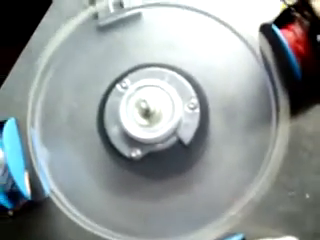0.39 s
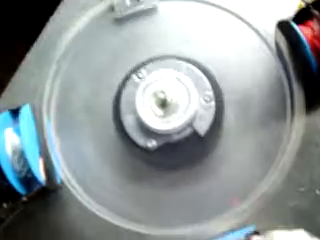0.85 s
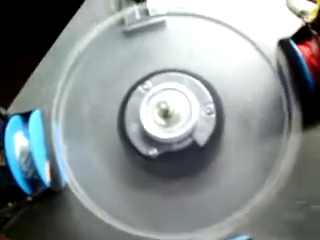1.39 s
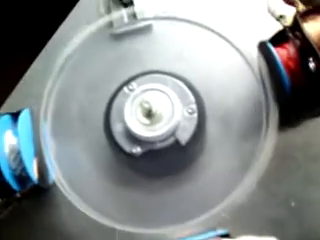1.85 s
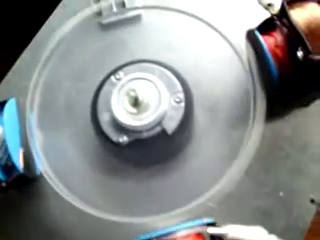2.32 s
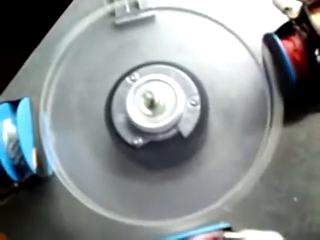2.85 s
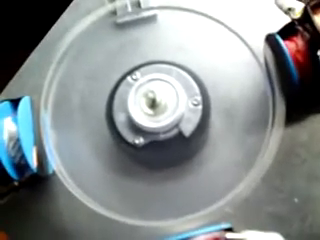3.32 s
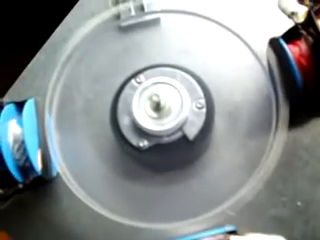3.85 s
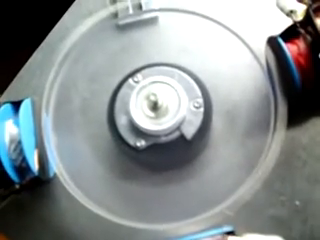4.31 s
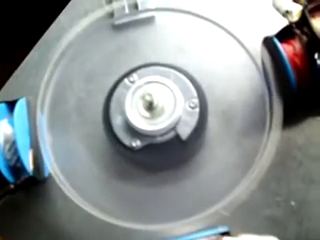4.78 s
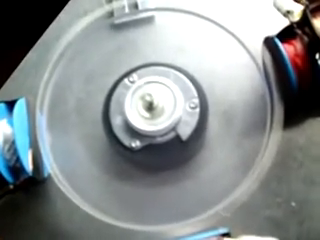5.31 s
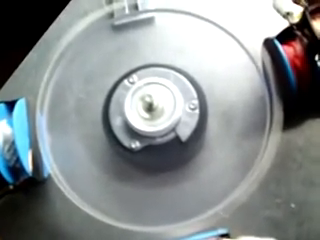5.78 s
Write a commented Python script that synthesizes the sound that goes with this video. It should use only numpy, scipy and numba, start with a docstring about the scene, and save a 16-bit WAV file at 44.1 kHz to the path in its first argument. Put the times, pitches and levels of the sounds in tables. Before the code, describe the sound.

Close and mono, a small disc rotor on a table runs with a steady, reedy low-mid hum, thin coil whine, rapid fused ticking and soft air noise. After about 2.3 seconds a switch snaps brightly, the level ducks briefly, and the hum slides smoothly downward to the end, swelling as it crosses resonances of the frame. Faint low rumble lies beneath.

```python
"""Magnet rotor switched off and coasting

A small disc rotor with four magnets spins past drive coils on a table, heard close up in mono.
Each passing magnet tugs the frame, which hums on multiples of the passing rate, ticks and stirs the air.
A switch snaps off, gain control ducks the level, and the hum glides down through the frame's resonances.
Low rumble, a faint hum, climbing tones as of a far engine and a late thin whistle lie beneath.
"""
import sys
import numpy as np
from scipy import signal
from scipy.fft import rfft, irfft, next_fast_len
from scipy.io import wavfile
from scipy.ndimage import minimum_filter1d, map_coordinates
from numba import njit

SR = 44100
rng = np.random.default_rng(int(sys.argv[2]) if len(sys.argv) > 2 else 0)


def magnitude_from_level(level_db):
    """Linear magnitude for a level in decibels (20 dB per decade)."""
    exponent = np.asarray(level_db, float) / 20
    return 10 ** exponent


def pcm_store(signal):
    """Save signal as 16-bit PCM."""
    levels = np.round(np.clip(np.atleast_2d(signal), -1, 1) * 32767)
    wavfile.write(sys.argv[1], SR, levels.astype(np.int16).T)


N = 260617
TIME_S = np.arange(N) / SR
SWITCH_S = 2.302
SINCE_SWITCH_S = np.clip(TIME_S - SWITCH_S, 0, None)
RUNNING_PER_S = 170.13                       # magnets per second
RUN_IN = round(28 * SR / RUNNING_PER_S)      # samples in seven whole turns


def rms_one(x):
    """Scale to rms 1."""
    return x / np.sqrt(np.mean(x ** 2) + 1e-20)


def drift(rate_hz):
    """Slow random wander of rms 1: critically damped low-pass noise, drawn at every 50th sample."""
    r = np.exp(-100 * np.pi * rate_hz / SR)
    noise = rng.standard_normal(N // 50 + 1002)
    slow = signal.lfilter([1], [1, -2 * r, r * r], noise)[1000:]
    return np.interp(np.arange(N) / 50, np.arange(len(slow)), rms_one(slow))


def cut(x, hz, kind, order=2):
    """Butterworth filter."""
    return signal.sosfilt(signal.butter(order, hz, kind, fs=SR, output="sos"), x)


def resonances(x, modes):
    """Two-pole resonances (Hz, width Hz, gain dB) side by side, signs alternating."""
    out = 0
    for k, (hz, width_hz, db) in enumerate(modes):
        r = np.exp(-np.pi * width_hz / SR)
        poles = [1, -2 * r * np.cos(2 * np.pi * hz / SR), r * r]
        zeros = np.array([1, 0, -1]) * (1 - r * r) / 2
        out = out + (-1) ** k * magnitude_from_level(db) * signal.lfilter(zeros, poles, x + 1e-18)
    return out


def coil_current():
    """1 while the coils are driven, exponential decay after the switch."""
    fade_s = 0.005
    return np.exp(-SINCE_SWITCH_S / fade_s)


def hum(passes, waver_db):
    """Force tones on multiples of the passing rate; their mix changes when the coil current dies."""
    # low tones, in multiples of the passing rate; fractions come from the uneven magnets
    low_multiples = [.25, .5, 1, 2, 3, 4, 4.75, 5, 6, 6.75, 7, 8, 9, 10, 11, 11.5, 12, 13, 14]
    # rms of each low tone ahead of pull and frame: coils_on_db, coasting_db
    low_tones = [(-55.5, -45.5), (-55, -50), (-18, -21), (-23, -20.5), (-36.5, -40), (-26, -27),
                 (-48.5, -50.5), (-36, -31.5), (-24.5, -32.5), (-47.5, -57), (-29.5, -40), (-44, -46.5),
                 (-36, -39), (-36.5, -45.5), (-37, -42.5), (-41.5, -56.5), (-42.5, -46.5), (-52.5, -46),
                 (-43, -45.5)]
    # high coil whines, in multiples of the passing rate
    whine_multiples = [15.25, 16, 20, 20.25, 23, 27.75, 28]
    whines = [(-43, -56)] * len(whine_multiples)      # coils_on_db, coasting_db
    lead_rad = 2.6      # low tones run ahead of the high ones, which shapes the pulse

    coils, out = coil_current(), 0
    multiples = [*low_multiples, *whine_multiples]
    for multiple, (on_db, off_db) in zip(multiples, [*low_tones, *whines]):
        gain = magnitude_from_level(off_db + coils * (on_db - off_db) + waver_db * drift(5.4))
        phase = 2 * np.pi * multiple * passes + lead_rad / multiple
        out = out + gain * np.sqrt(2) * np.cos(phase)
    return out


def frame(force, reach):
    """Plain path less each mode: a dip just below every resonance, a shoulder above it."""
    # frame resonances: mode_hz, width_hz, level_db above the plain path
    frame_modes = [(374.1, 2.63, 28), (378.6, 3.2, 30), (434, 19, 4), (556, 96, 0), (791, 12, 5),
                   (860, 140, -2), (1164.9, 14.1, 23.5), (1879.6, 25, 10)]
    force = np.concatenate([force[:RUN_IN], force])       # modes already ring at the start
    out = force
    for hz, width_hz, db in frame_modes:
        r, w = np.exp(-np.pi * width_hz / SR), 2 * np.pi * hz / SR
        near = resonances(force, [(hz, reach * hz, db)])      # far-off tones leave the mode alone
        poles = [1, -2 * r * np.cos(w), r * r]
        out = out - signal.lfilter([0, 2 * (1 - r) * np.sin(w)], poles, near)
    return out[RUN_IN:]


def bearing(passes):
    """Rolling parts give fractional multiples, each heard mainly while it crosses its mode."""
    # bearing tones, in multiples of the passing rate
    bearing_multiples = [2.512, 7.56, 8.63, 9.7]
    # mode each one wakes: mode_hz, width_hz, level_db (rms of a steady tone at the peak)
    bearing_swells = [(377.6, 5.9, -16.5), (1194, 23, -29.5), (1171, 26, -24), (1173, 39, -29.5)]
    out, settle = 0, np.clip(np.arange(N) / RUN_IN, 0, 1)
    for multiple, (hz, width_hz, db) in zip(bearing_multiples, bearing_swells):
        tone = settle * np.sqrt(2) * np.cos(2 * np.pi * multiple * passes)
        once = resonances(tone, [(hz, width_hz, db)])
        out = out + resonances(once, [(hz, width_hz, 0)])
    return out


def air(passes, gust_depth, patchy_db, frame_share):
    """Noise of the stirred air, puffed once per magnet; a share shakes the frame."""
    # air noise spectrum: freq_hz, level_db (relative)
    air_spectrum = [(20, -11.5), (60, -7), (120, 2.5), (200, 4.5), (420, 0), (700, 2), (1170, 2),
                    (1500, -3.5), (2200, -6.5), (2800, -6), (3100, -11), (4050, -14.5), (4600, -15.5),
                    (5400, -20), (6400, -30.5), (7100, -47)]
    size = next_fast_len(N)
    hz, db = np.transpose(air_spectrum)
    bins_hz = np.arange(size // 2 + 1) * SR / size
    spectrum_db = np.interp(np.log(bins_hz + 1), np.log(hz), db)
    noise = irfft(rfft(rng.standard_normal(size)) * magnitude_from_level(spectrum_db), size)[:N]
    puffs = 1 + gust_depth * np.cos(2 * np.pi * passes)
    noise = noise * puffs * magnitude_from_level(patchy_db * drift(2.0))
    return rms_one(noise + frame_share * (frame(noise, reach=1.0) - noise))


def ticks(passes, tail, fresh):
    """Rattle per magnet rings the chassis: one part repeats every turn, one is new each time."""
    # magnet differences: strength_db (relative), place_spacings
    magnets = [(0, .01), (-2, .03), (-1, -.02), (-2.5, .04)]
    # chassis resonances: mode_hz, width_hz, gain_db (relative)
    chassis_modes = [(1894, 83, -6.5), (2616, 100, 3), (3468, 88, 5), (4160, 480, -7.5), (4660, 290, 1.5),
                     (6400, 230, -18.5), (6275, 190, -7.5)]
    strength_db, place = np.transpose(magnets)
    magnet = passes.astype(int) % len(magnets)
    burst = 0
    for db, at in [(0, 0), (-9, .5)]:       # a weaker tick half a spacing later, as the magnet leaves
        burst = burst + magnitude_from_level(db) * np.exp(-((passes - place[magnet] - at) % 1) / tail)
    burst = burst * magnitude_from_level(strength_db[magnet])

    bumps = rng.standard_normal(512)                       # roughness around the rim
    angle = passes / len(magnets) % 1 * len(bumps)
    same = map_coordinates(bumps, [angle], order=3, mode="grid-wrap")
    rattle = burst * (same + fresh * rng.standard_normal(N))
    return rms_one(resonances(rattle, chassis_modes))


def rumble():
    """Low shaking carried through the table: band noise, rms 1."""
    return rms_one(cut(rng.standard_normal(N), [25, 110], "band"))


def far_tones(second_db, waver_db):
    """Faint steady hum until the switch; climbing tones with a weak second harmonic fade in and out."""
    # low tones as of a far engine pulling away: start_s, end_s, start_hz, end_hz, level_db
    # (level_db: rms of the fundamental, before fade and waver)
    far_engine = [(.3, 2.35, 60, 109, -38.5), (2.55, 5.35, 57, 100, -36), (4.1, 5.8, 64, 85, -35.5)]
    hum_hz, hum_rms_db = 55, -45.5
    out = magnitude_from_level(hum_rms_db) * np.sqrt(2) * np.sin(2 * np.pi * hum_hz * TIME_S) * (TIME_S < SWITCH_S)
    for start_s, end_s, start_hz, end_hz, db in far_engine:
        pitch_hz = np.interp(TIME_S, [start_s, end_s], [start_hz, end_hz])
        phase = 2 * np.pi * np.cumsum(pitch_hz) / SR
        progress = np.clip((TIME_S - start_s) / (end_s - start_s), 0, 1)
        fade = np.sin(np.pi * progress) ** 0.26
        tone = np.sin(phase) + magnitude_from_level(second_db) * np.sin(2 * phase)
        out = out + magnitude_from_level(db + waver_db * drift(17.0)) * np.sqrt(2) * fade * tone
    return out


def switch():
    """Bright snap of a few ms, its plastic body, and a one-sided pressure push that sinks away."""
    snap_peak_db, snap_hz, push_db, push_fade_s = 4, 12500, -16, .06
    bounce_s, bounce_db = .0037, -8         # the contact bounces once
    t = SINCE_SWITCH_S
    again = np.clip(t - bounce_s, 0, None)
    first = (t > 0) * np.exp(-t / .0015)
    second = magnitude_from_level(bounce_db) * (again > 0) * np.exp(-again / .002)
    burst = (first + second) * rng.standard_normal(N)
    body = resonances(burst, [(4200, 1600, -7)])
    snap = cut(burst, snap_hz, "high", order=4) + body
    push = (1 - np.exp(-t / .002)) * np.exp(-t / push_fade_s)
    return magnitude_from_level(snap_peak_db) * snap / np.abs(snap).max() + magnitude_from_level(push_db) * push


def whistle():
    """Thin fixed sine that comes up late."""
    pitch_hz, start_s, rise_s, top_rms_db = 3841, 3.3, 0.93, -50.5
    rise = np.clip((TIME_S - start_s) / rise_s, 0, 1) ** 2
    return magnitude_from_level(top_rms_db) * rise * np.sqrt(2) * np.sin(2 * np.pi * pitch_hz * TIME_S)


def scene():
    """Hum through the frame, plus bearing, air, ticks, rumble, far tones, switch and whistle."""
    # magnetic pull on the frame: time_s, level_db
    pull_curve = [(0, -3.5), (2.29, -4), (2.33, -3), (2.8, 2), (3.4, -1.5), (4.3, -3), (5.2, -0.5),
                  (5.6, -3.5), (5.91, -8.5)]
    slowing, easing = 15.854, .5604     # loss of rate per s; its let-up per s squared
    rate = RUNNING_PER_S - slowing * SINCE_SWITCH_S + easing * SINCE_SWITCH_S ** 2
    passes = np.cumsum(rate) / SR
    octaves = np.log2(rate / RUNNING_PER_S)
    off = 1 - coil_current()
    pull_db = np.interp(TIME_S, *np.transpose(pull_curve))

    # air and ticks follow the pull and fade as the rotor slows
    air_db = -23 + 0.65 * pull_db + 2 * octaves
    tick_db = -30.5 + pull_db + 8.2 * octaves - 6.5 * off      # softer without coil current
    rumble_db = -52.5 + 15 * off

    force = magnitude_from_level(pull_db) * hum(passes, waver_db=0.47)
    out = frame(force, reach=0.27) + bearing(passes)
    out = out + magnitude_from_level(air_db) * air(passes, gust_depth=.15, patchy_db=.25, frame_share=.04)
    out = out + magnitude_from_level(tick_db) * ticks(passes, tail=0.13, fresh=1.0)
    out = out + magnitude_from_level(rumble_db) * rumble() + far_tones(second_db=-12, waver_db=2.5)
    return (out + switch() + whistle())[None]


@njit
def follow(level_db, start_db, attack, release):
    """One-pole level follower: rises fast with the peaks, falls slowly."""
    out, held = np.empty_like(level_db), start_db
    for i in range(len(level_db)):
        held += (level_db[i] - held) * (attack if level_db[i] > held else release)
        out[i] = held
    return out


def gain_control(x):
    """Squeezes level about a knee, driven by peaks with a short look ahead."""
    knee_db, squeeze, attack_s, release_s = -8.5, 0.65, 0.00014, 0.22
    peaks = -minimum_filter1d(-np.abs(x[0]), size=300, origin=110)   # about one magnet cycle
    level_db = 20 * np.log10(peaks + 1e-6)
    held_db = follow(level_db, knee_db, 1 / (attack_s * SR), 1 / (release_s * SR))
    return x * magnitude_from_level(-squeeze * (held_db - knee_db))


def roll_off(x):
    """The treble ends steeply here."""
    return signal.sosfilt(signal.butter(12, 7070, fs=SR, output="sos"), x)


def record(dry):
    """Gain control, a gentle bass cut, then a steep top cut."""
    x = cut(gain_control(dry), 8.0, "high", order=1)
    top_cut = signal.cheby2(10, 60, 8000, fs=SR, output="sos")
    x = signal.sosfilt(top_cut, x)
    return roll_off(x)


dry = scene()
out = record(dry)
pcm_store(out)
```